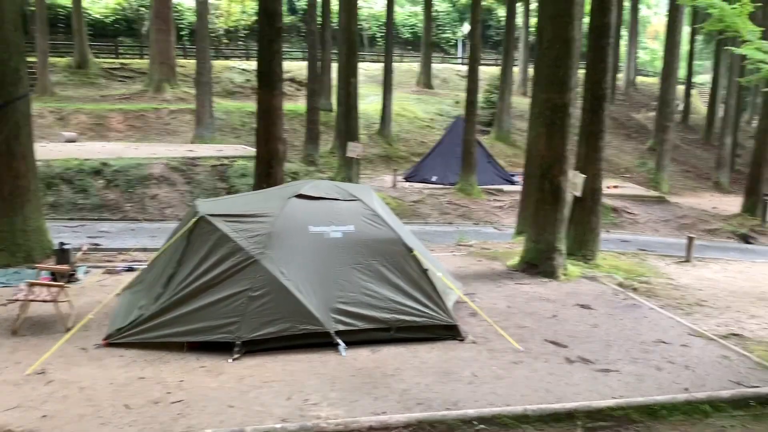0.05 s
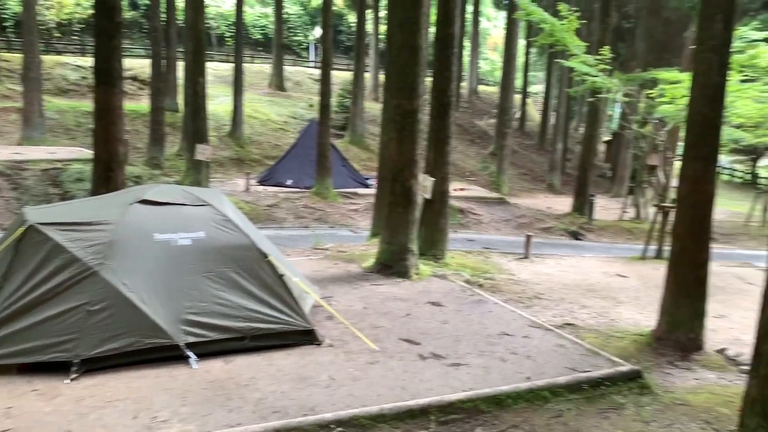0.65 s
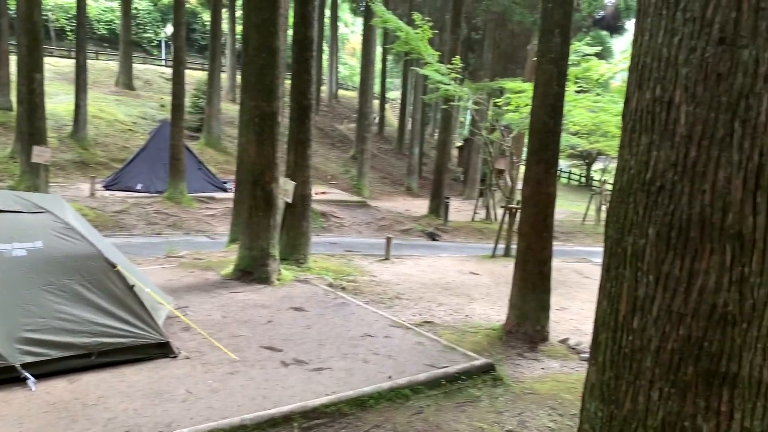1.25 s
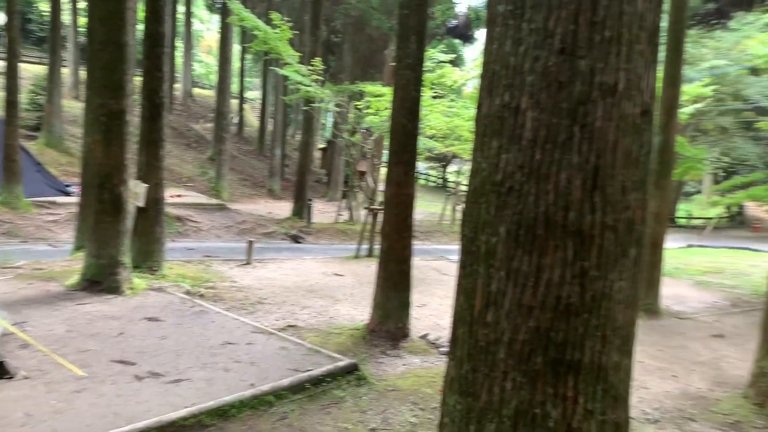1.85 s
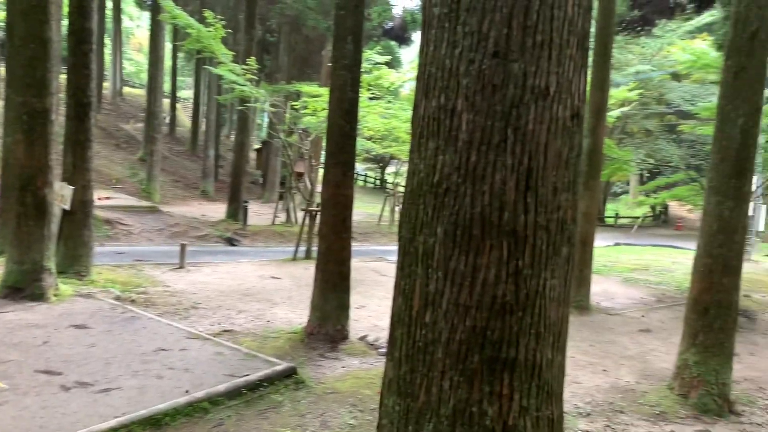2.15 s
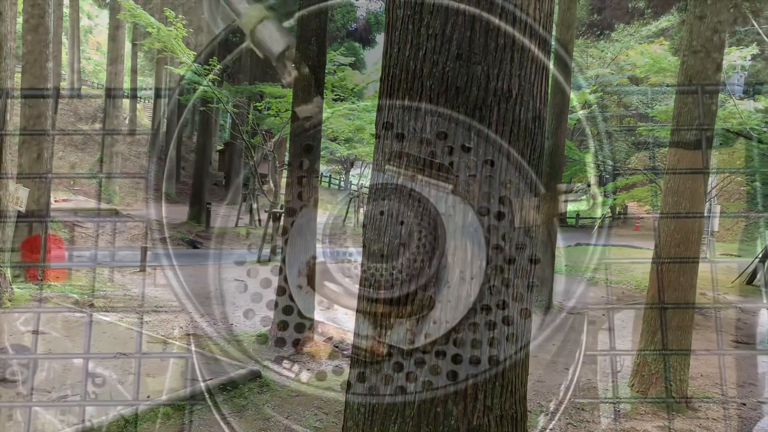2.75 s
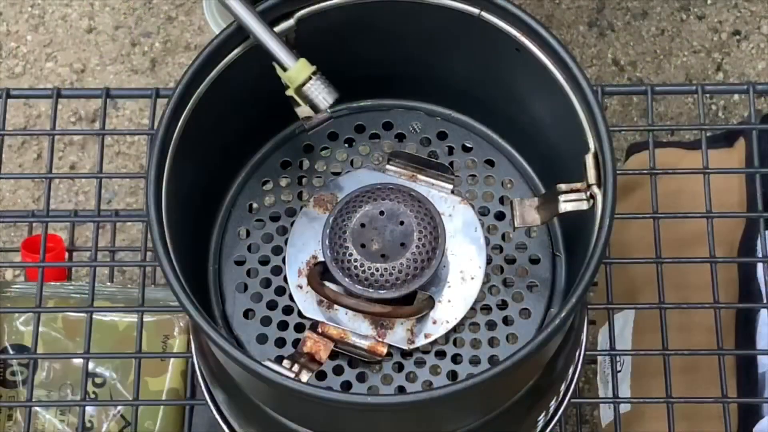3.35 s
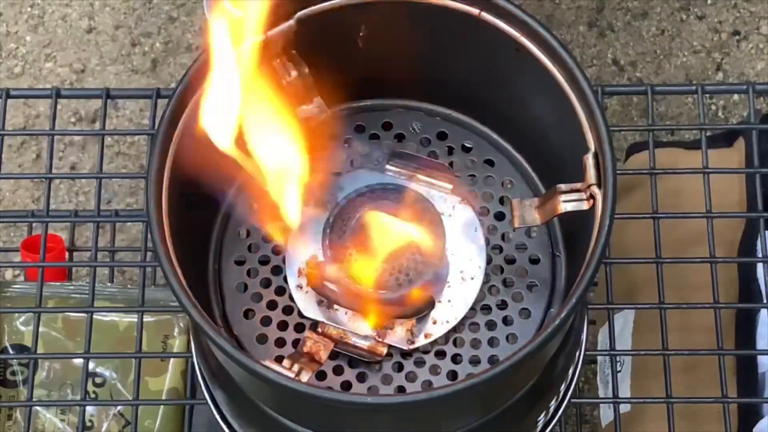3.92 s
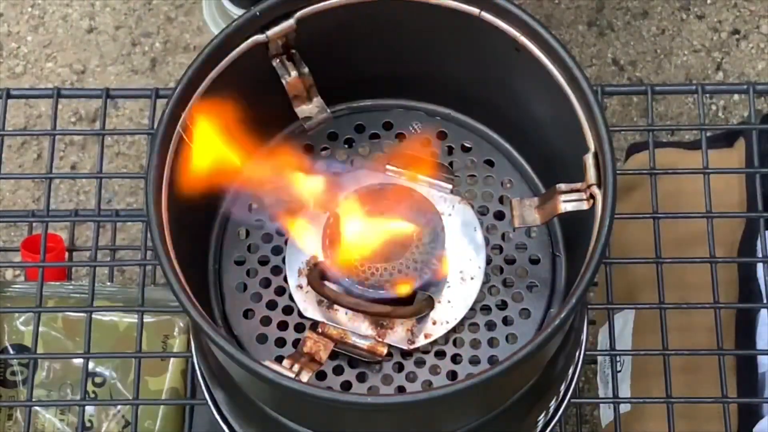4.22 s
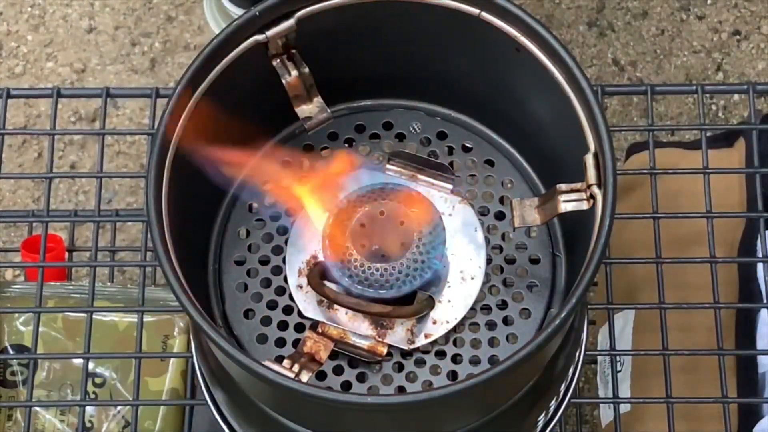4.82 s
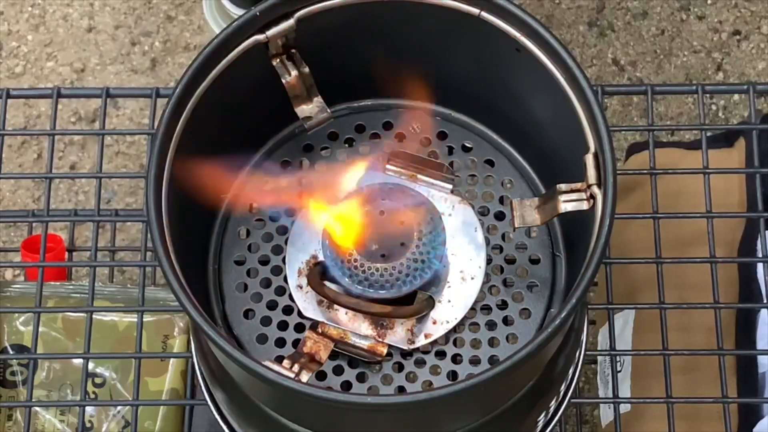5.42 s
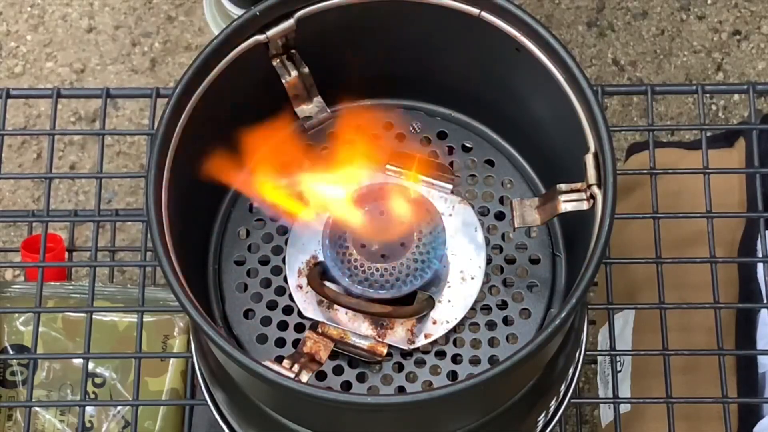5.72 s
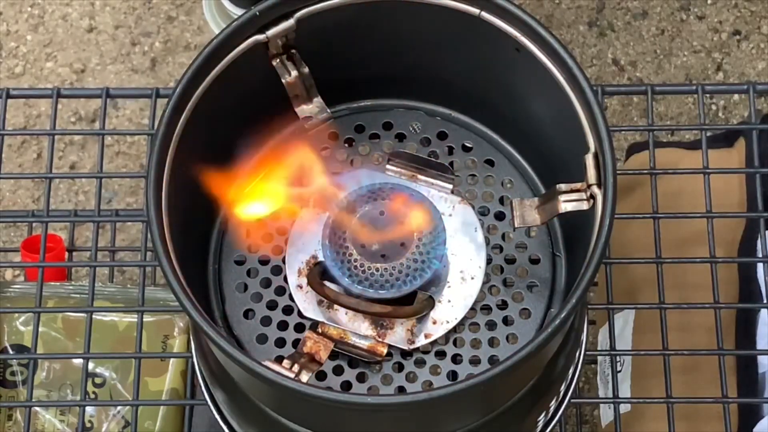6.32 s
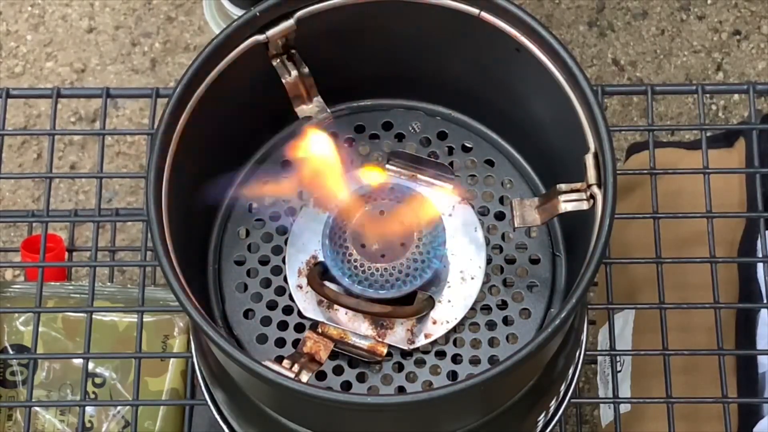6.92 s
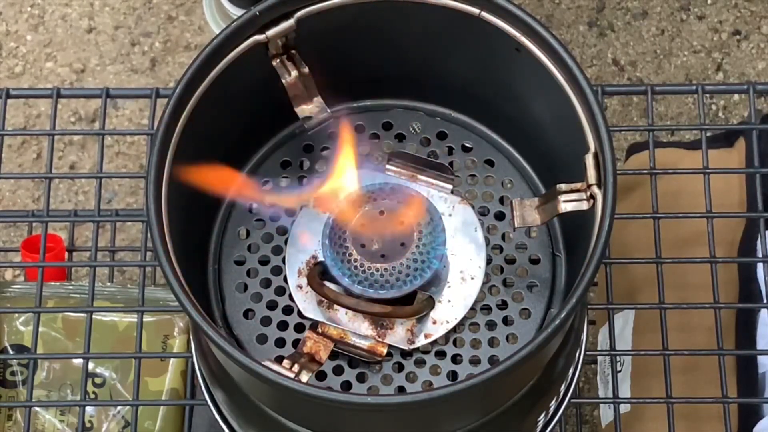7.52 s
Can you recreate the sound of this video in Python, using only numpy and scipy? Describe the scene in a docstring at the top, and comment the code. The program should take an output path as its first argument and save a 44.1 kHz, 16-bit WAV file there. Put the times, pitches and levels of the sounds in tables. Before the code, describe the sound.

A small bird gives a string of echoing chirps over the faint, low rush of a forest, with two soft, distant hoots and a very faint cricket. The steady hiss of a camp stove fades in close by, slightly to the left. A lighter snaps, the fuel catches with a whoomph, and the flame settles into a fluttering, hissing roar. A brief crackle ends in a sharp pop, then three quick spits of fuel knock against the steel windshield.

```python
"""A small bird chirps over the low rush of a forest, with a faint cricket and two soft, distant hoots.
The forest gives way to a camp stove, its fuel hissing from the nozzle inside a steel windshield.
A lighter snaps, the fuel catches with a whoomph, and the flame settles into a fluttering roar.
Droplets crackle through the nozzle and pockets of vapour pop. Then the jet spits liquid fuel
three times, each spit flaring in the flame and setting the steel ringing."""
import sys
import numpy as np
from scipy import signal
from scipy.fft import rfft, irfft, next_fast_len
from scipy.io import wavfile
from scipy.ndimage import uniform_filter1d, map_coordinates

SR = 44100
rng = np.random.default_rng(int(sys.argv[2]) if len(sys.argv) > 2 else 0)


def wav_out(sig):
    """Save sig, one row per channel (or a flat mono array), as 16-bit PCM at SR to the path in sys.argv[1]."""
    wavfile.write(sys.argv[1], SR, np.round(np.clip(np.atleast_2d(sig).T, -1, 1) * 32767).astype(np.int16))


N = 338247
FADE_S, FADE_LENGTH_S = 2.4, 1  # the forest gives way to the stove
LIT_S = 3.63  # the fuel catches


def amp(db):
    """Turn decibels into a number to multiply by."""
    return 10 ** (np.asarray(db) / 20)


def unit(x):
    """Scale x to an average strength (rms) of 1."""
    return x / np.sqrt(np.mean(x ** 2) + 1e-20)


def along(points, hz):
    """Read between the rows of a (frequency, value) table, on a log scale."""
    freqs, values = np.transpose(points)
    return np.interp(np.log(hz + 1), np.log(freqs + 1), values)


def clock():
    """The time of each sample in seconds."""
    return np.arange(N) / SR


def ramp(start, length):
    """A straight rise from 0 to 1."""
    return np.clip((clock() - start) / length, 0, 1)


def burst(start, t60, attack, hold=0):
    """A level that rises, holds and dies away; t60 is always the seconds taken to fade by 60 dB."""
    t = np.maximum(clock() - start, 0)
    decay = amp(-60 * np.clip((t - hold) / t60, 0, 2))
    return (1 - np.exp(-t / attack)) * decay * (t < hold + 2 * t60)


def placed(x, start):
    """Delay a sound by start seconds."""
    return np.pad(x, (int(start * SR), N))[:N]


def wobble(rate, size=N):
    """A smooth curve through rate random values a second."""
    values = rng.standard_normal(int(size * rate / SR) + 4)
    return map_coordinates(values, [np.arange(size) * rate / SR])


def filtered(x, response):
    """Multiply each frequency in x by response(hz)."""
    size = next_fast_len(N + 8192)
    return irfft(rfft(x, size) * response(np.fft.rfftfreq(size, 1 / SR)), size)[..., :N]


def noise(spectrum, boost_db=lambda hz: 0):
    """Noise shaped by a table of frequencies and levels, plus an optional boost."""
    return unit(filtered(rng.standard_normal(N), lambda hz: amp(along(spectrum, hz) + boost_db(hz))))


def echoes(x, decay, length):
    """A wash of echoes for each ear; each frequency dies at its own speed."""
    hz, t, bands = signal.stft(rng.standard_normal((2, int(length * SR))), SR, nperseg=128)
    tail = signal.istft(bands * amp(-60 * t / along(decay, hz)[:, None]), SR)[1]
    return signal.fftconvolve(x[None], tail / np.linalg.norm(tail[0]), axes=1)[:, :N]


# The forest air. Each row: frequency in Hz, level in dB.
AIR_TONE = [(25, -9), (70, 5.5), (130, -7.5), (220, -13), (370, -6), (700, -25.5), (1500, -26.5),
            (5000, -30), (15000, -37)]
# How alike the air is in both ears. Each row: frequency in Hz, likeness from 0 to 1.
AIR_LIKENESS = [(180, 0.94), (550, 0.44), (1650, 0.012)]
# One swell: start, rise, hold and fade in seconds, then the added rush in dB against the calm.
AIR_SWELL = (1.39, 0.023, 0.6, 1.3, 2)


def forest_air(calm_db=-69.0, by_stove_db=-8, waver_db=2.5, hiss_db=-84):
    """The low rush of the valley swells once and recedes, over a faint, even hiss."""
    spread = lambda hz: np.arccos(np.clip(along(AIR_LIKENESS, hz), -1, 1)) / 2
    mid = filtered(noise(AIR_TONE), lambda hz: np.cos(spread(hz)))
    side = filtered(noise(AIR_TONE), lambda hz: np.sin(spread(hz)))
    ears = np.array([mid + side, mid - side])
    rush = filtered(ears, lambda hz: 1 / (1 + (hz / 1500) ** 4))
    start, attack, hold, t60, db = AIR_SWELL
    swell = 1 + amp(db) * burst(start, t60, attack, hold)
    level_db = calm_db + by_stove_db * ramp(FADE_S, FADE_LENGTH_S) + waver_db * wobble(23)
    return rush * swell * amp(level_db) + amp(hiss_db) * unit(ears - rush)


# The cricket's thin rasp. Each row: frequency in Hz, level in dB.
CRICKET_TONE = [(10500, -65), (12800, 9), (13800, 7), (16000, -31)]


def cricket(db=-87, depth_db=4, pulse_hz=11.6):
    """A faint bush cricket rasps high up in even pulses."""
    pulse = np.cos(2 * np.pi * pulse_hz * (clock() - .04))
    rasp = np.array([noise(CRICKET_TONE), noise(CRICKET_TONE)])
    return amp(db + depth_db * pulse) * rasp * (clock() < FADE_S)


# Distant calls. Each row: start in seconds, length in seconds, top pitch in Hz, level in dB.
HOOTS = [(0.048, 0.51, 1373, -78.5), (1.432, 0.221, 1210, -68.5)]


def far_bird(arch_hz=119.3, waver_hz=70):
    """Soft, unsteady hoots whose pitch and strength rise and fall together."""
    calls = np.zeros(N)
    for start, length, top_hz, db in HOOTS:
        arch = np.sin(np.linspace(0, np.pi, int(length * SR)))
        hz = top_hz - arch_hz * (1 - arch) + waver_hz * wobble(160, size=len(arch))
        calls += placed(amp(db) * arch * np.sin(2 * np.pi * np.cumsum(hz) / SR), start)
    return calls


# The higher tones in the near bird's voice. Each row: multiple of the pitch, level in dB.
VOICE_OVERTONES = [(1.5, -35), (2, -17.5), (3, -27), (4, -26)]
# How throat and beak lift those tones. Each row: frequency in Hz, boost in dB.
BEAK_BOOST = [(2500, 10), (3600, 29), (4900, 13), (5800, 3.5), (7100, 0.5), (8300, 1), (14000, -0.5)]


def chirp(overtones_db, rasp_db, contour, rasp, hoarse_below_hz=3300, hoarse_range_hz=900, lag_s=35e-6):
    """One chirp climbs and drops; at low pitch the voice turns shaky, dull and hoarse."""
    times, pitches, levels = np.transpose(contour)
    t = np.arange(times[0], times[-1], 1 / SR)
    shake = lambda rate: wobble(rate, size=len(t))
    pitch, level_db = np.interp(t, times, pitches), np.interp(t, times, levels)
    hoarse = np.clip((min(hoarse_below_hz, pitches.max()) - pitch) / hoarse_range_hz, 0, 1)
    pitch *= 1 + (.005 + .04 * hoarse) * shake(466)
    ear_shift = pitch * lag_s * np.array([[.5], [-.5]])  # the left ear hears it first
    phase = 2 * np.pi * (np.cumsum(pitch) / SR + ear_shift) + .1 * shake(1100)
    tone = amp(-1 * hoarse) * np.sin(phase)
    overtones = sum(amp(db + along(BEAK_BOOST, k * pitch) + 4.5 * shake(269)) * np.sin(k * phase)
                    for k, db in VOICE_OVERTONES)
    # Overtones fade less than the main tone in the quiet parts.
    brightness = amp(overtones_db + .3 * (level_db.max() - level_db) - 9 * hoarse)
    rasp = filtered(rasp, lambda hz: amp(overtones_db * (hz > 5000)))  # its treble follows the overtones
    grit = amp(rasp_db) * hoarse * rasp[int(times[0] * SR):][:len(t)]
    opening = np.clip((t - t[0]) / .016, 0, 1) ** 2  # the chirp starts as a pure tone
    edges = np.clip(np.minimum(t - t[0], t[-1] - t) / .005, 0, 1)
    loudness = edges * amp(level_db + 1.7 * shake(295.6))
    voice = loudness * (tone + opening * (brightness * overtones + opening * grit))
    return np.array([placed(ear, times[0]) for ear in voice])


# The near bird's song. Each row: overtones, hoarseness and echo in dB, then the chirp's shape
# as a list of points, each with time in seconds, pitch in Hz, level in dB.
SONG = [ (-16, -16, 6, [(.203, 2650, -73), (.212, 3020, -62), (.245, 3300, -53), (.3, 3350, -53),
        (.318, 2650, -65), (.335, 2600, -73)]), (-18, -8, 6, [(.91, 2700, -75), (.93, 3100, -63),
        (.968, 3170, -58), (.99, 2850, -64), (1.015, 2200, -66), (1.048, 1700, -72)]),
        (3.5, -4.5, 3, [(1.399, 2650, -65), (1.413, 3200, -50), (1.44, 3420, -51), (1.474, 3500, -42),
        (1.492, 3100, -51), (1.52, 1820, -60), (1.548, 1700, -65)]), (0.5, -4.5, 0, [(1.69, 1600, -64),
        (1.7, 3200, -48), (1.738, 3650, -44), (1.757, 4080, -33.5), (1.771, 3920, -34), (1.78, 3150, -46),
        (1.797, 1950, -55), (1.827, 1700, -57)]), (0, -1.5, -1.5, [(2.019, 1700, -62), (2.026, 3250, -44),
        (2.065, 4480, -36.5), (2.108, 4980, -36.5), (2.122, 4400, -39), (2.126, 3000, -48),
        (2.135, 1650, -61), (2.172, 1650, -63)]), (-5, -2, -1, [(2.168, 1900, -61), (2.177, 3750, -50),
        (2.195, 4550, -39), (2.211, 4150, -42), (2.22, 2450, -55), (2.237, 2300, -66)]),
        (-10, -2, 0, [(2.919, 3350, -56), (2.958, 3720, -48), (2.98, 4200, -45), (2.994, 3850, -51),
        (3.018, 2100, -66)]), ]
# The hoarse part of its voice. Each row: frequency in Hz, level in dB.
RASP_TONE = [(1100, -22), (1900, -1), (3900, 7), (5800, -3), (9000, -3), (14000, -26)]
# Echoes from the ground, near trunks and deep forest. Each row: frequency in Hz, fade in seconds.
GROUND_ECHO = [(4000, .03)]
TRUNK_ECHO = [(1500, 0.3), (4000, 0.62), (12000, 0.25)]
FOREST_ECHO = [(500, 0.7), (4000, 1.06), (8000, 1.3), (14000, 0.13)]


def birds(hill_delay_s=0.1, dull_hz=15000, echo_above_hz=1900):
    """The near song bounces off ground, trunks and hillside; the far bird arrives only as echo."""
    rasp = noise(RASP_TONE)
    song, outward = np.zeros((2, N)), np.zeros(N)
    for overtones_db, rasp_db, echo_db, contour in SONG:
        voice = chirp(overtones_db, rasp_db, contour, rasp)
        song += voice
        outward += amp(echo_db) * voice[0]
    direct = filtered(song, lambda hz: 1 / (1 + (hz / dull_hz) ** 20))
    near = filtered(outward, lambda hz: hz ** 4 / (hz ** 4 + echo_above_hz ** 4))
    far = far_bird()
    ground = amp(-5) * echoes(direct[0], GROUND_ECHO, length=.5)
    trunks = amp(-5.5) * echoes(near, TRUNK_ECHO, length=0.65)
    hillside = amp(-12) * echoes(placed(near, hill_delay_s), TRUNK_ECHO, length=0.41)
    forest = echoes(amp(-10) * near + far, FOREST_ECHO, length=0.68)
    return amp(-0.7) * direct + ground + trunks + hillside + forest


# Where the steel windshield rings. Each row: frequency in Hz, width in Hz, boost in dB.
STEEL_PEAKS = [(2620, 110, 4), (3470, 130, 5.5), (4400, 195, 5.5), (4843, 266, 11), (7600, 90, 2.5),
               (10600, 300, 8.5)]


def steel_hiss(spectrum, ring):
    """A hiss coloured by the windshield; ring scales the steel's boosts."""
    peaks = lambda hz: sum(db * np.exp(-((hz - mid) / width) ** 2) for mid, width, db in STEEL_PEAKS)
    return noise(spectrum, lambda hz: ring * peaks(hz))


# The hiss of unlit fuel. Each row: frequency in Hz, level in dB.
GAS_TONE = [(150, -14.5), (330, -27), (600, -8.5), (1500, -7.5), (2100, -12.5), (3100, -12.5), (3750, -7),
            (4150, 2), (4650, 2), (5300, -9), (6600, 3), (8500, -4.5), (9700, -4), (13000, -25.5),
            (15500, -9)]


def unlit_jet(db=-46, catch_s=0.033, t60=0.34):
    """Fuel streams evenly from the nozzle until the flame reaches it."""
    dying_db = -60 * np.maximum(clock() - LIT_S - catch_s, 0) / t60
    loudness = ramp(FADE_S, FADE_LENGTH_S) * amp(db + dying_db + 0.12 * wobble(14))
    return loudness * steel_hiss(GAS_TONE, ring=0.25)


def cracks(rows, spectrum, t60):
    """Sharp clicks of noise, one for each row's start and level."""
    return noise(spectrum) * sum(amp(db) * burst(start, t60, attack=.0001) for start, db, *_ in rows)


def knock(rows, hz, ring_db, t60):
    """Each crack sets off a short, slightly wavering ring."""
    waver = .5 * wobble(160)
    tone = lambda start: np.sin(2 * np.pi * hz * (clock() - start) + waver)
    return sum(amp(db + ring_db) * burst(start, t60, attack=0.0005) * tone(start) for start, db in rows)


# The lighter's snap. Each row: start in seconds, level in dB.
LIGHTER_SNAPS = [(3.6283, -7.5)]
# Its click. Each row: frequency in Hz, level in dB.
SNAP_TONE = [(900, -12.5), (1650, -15), (2200, -27), (3000, -3.5), (4000, -8), (5300, -3.5), (6800, 5),
             (10000, -7), (12500, -9), (15000, -9)]
# Its metal tip. Each row: pitch in Hz, level in dB, fade in seconds.
TIP_RINGS = [(1350, -8, .012), (1720, -5, .016), (7000, -2, .008)]


def lighter():
    """The lighter snaps and its metal tip rings."""
    click = cracks(LIGHTER_SNAPS, SNAP_TONE, t60=0.017)
    return click + sum(knock(LIGHTER_SNAPS, hz, db, t60) for hz, db, t60 in TIP_RINGS)


# The flame's roar and the burning jet's hiss. Each row: frequency in Hz, level in dB.
ROAR_TONE = [(20, -33), (65, 7), (130, 0), (300, -4), (550, -12.5), (1100, -12), (2100, -20), (4500, -71)]
JET_TONE = [(900, 3.5), (2000, -5.5), (4000, 1.5), (5300, 2), (7500, 1), (10000, 1), (12000, -24),
            (14500, -3.5), (15700, -3.5)]
# The nozzle's breathy whistle. Each row: time in seconds, pitch in Hz, level in dB.
WHISTLE_PATH = [(3.7, 7300, -85), (3.88, 7300, -56), (3.95, 7400, -74), (4.06, 7100, -66),
                (4.27, 6250, -69), (4.6, 6700, -77), (4.71, 8100, -63), (4.92, 7750, -58), (5.1, 7500, -64),
                (6.1, 7800, -60.5), (7.67, 7510, -61.5)]


def flame(roar_db=-53.5, jet_db=-53, warm_up_s=0.52, whistle_width_hz=750, wander_hz=130):
    """The roar grows as the burner warms; the jet's hiss and whistle waver with the fuel pressure."""
    cold = np.exp(-np.maximum(clock() - LIT_S, 0) / warm_up_s)
    pressure = wobble(12)
    flutter_db = 1.7 * wobble(18)
    rumble = unit(noise(ROAR_TONE) * amp(2 * wobble(150)))
    roar = amp(roar_db - 11 * cold + flutter_db) * rumble
    jet = amp(jet_db - 7.5 * cold) * patchy(steel_hiss(JET_TONE, ring=0.95))
    times, pitches, levels = np.transpose(WHISTLE_PATH)
    pitch = np.interp(clock(), times, pitches) + wander_hz * pressure
    band = wobble(whistle_width_hz) + 1j * wobble(whistle_width_hz)
    breath = np.real(band * np.exp(2j * np.pi * np.cumsum(pitch) / SR))  # noise moved up to the pitch
    whistle = amp(np.interp(clock(), times, levels)) * unit(breath)
    return (roar + amp(pressure) * (jet + whistle)) * ramp(LIT_S, 0.068)


def patchy(hiss, depth_db=1.5):
    """Make a hiss uneven, in random patches about 600 Hz wide and 70 ms long."""
    bands = signal.stft(hiss, nperseg=512)[2]
    patches = uniform_filter1d(rng.standard_normal(bands.shape), size=7, axis=0)
    patches = uniform_filter1d(patches, size=12, axis=1)
    return signal.istft(bands * amp(depth_db * unit(patches)))[1][:N]


# Tongues of flame leaping up. Each row: start in seconds, length in seconds, level in dB.
TONGUES = [(3.671, 0.026, -35), (3.721, 0.041, -36), (3.784, 0.017, -42.5), (4.37, 0.08, -53.5),
           (4.887, 0.36, -56.5), (6.762, 0.56, -54.5)]
# The low whoomph and the tongues' roar. Each row: frequency in Hz, level in dB.
THUMP_TONE = [(20, -2), (65, 5.5), (130, 4.5), (300, -16), (700, -32)]
TONGUE_TONE = [(80, 4), (250, 13), (600, 6), (1200, 1), (2200, -12), (6000, -50)]


def ignition(thump_db=-31.5, sizzle_db=-36):
    """Pooled fuel goes up with a whoomph and a sizzle; tongues of flame leap up then and later."""
    thump = amp(thump_db) * burst(LIT_S, t60=0.28, attack=0.046, hold=0.13) * noise(THUMP_TONE)
    tongues = sum(amp(db) * burst(start, t60=0.072, attack=0.18 * length, hold=length)
                  for start, length, db in TONGUES)
    roar = tongues * unit(noise(TONGUE_TONE) * amp(3 * wobble(160)))
    sizzle = amp(sizzle_db) * burst(LIT_S + 0.095, t60=0.4, attack=0.0036, hold=0.0093)
    return thump + roar + sizzle * steel_hiss(JET_TONE, ring=0.091)


# One faint pop and one loud one. Each row: start in seconds, level in dB.
VAPOUR_POPS = [(4.19, -43), (5.3174, -19)]
# The sound of a pop. Each row: frequency in Hz, level in dB.
POP_TONE = [(400, -8.5), (1200, -14), (2200, 3), (3500, -16), (5000, -3.5), (12000, -12), (15000, -17)]


def pops():
    """A pocket of vapour bursts with a click and a very short ring."""
    return cracks(VAPOUR_POPS, POP_TONE, t60=0.016) + knock(VAPOUR_POPS, hz=2260, ring_db=-1, t60=0.008)


# A quick run of fuel droplets. Each row: start in seconds, level in dB.
DROPLET_TICKS = [(5.2078, -26), (5.2232, -25), (5.2354, -20), (5.2442, -25), (5.2512, -25), (5.266, -18),
                 (5.2723, -18.5), (5.2788, -17.5), (5.2845, -18), (5.291, -21), (5.298, -25), (5.3072, -22)]
# The sound of a tick. Each row: frequency in Hz, level in dB.
TICK_TONE = [(600, -9), (2500, -1.5), (4300, -9), (5700, -4), (6900, 5), (11500, -4), (15000, 2)]


def droplets(fizz_db=-25):
    """Each droplet ticks through the nozzle and leaves a short fizz."""
    ticks = cracks(DROPLET_TICKS, TICK_TONE, t60=.006)
    return ticks + amp(fizz_db) * cracks(DROPLET_TICKS, TICK_TONE, t60=.04)


# Spits of fuel; the first three run together. Each row: start in seconds, crack in dB,
# spray in dB, spray length in seconds, flare in dB, ring in dB.
FUEL_SPITS = [(6.1412, -25.5, -42, .0021, -34, -31.5), (6.1574, -42, -46, 0.0053, -41, -35.5),
              (6.1698, -28, -45, .0066, -30, -35), (6.3096, -40, -38, 0.0029, -29.5, -39.5),
              (6.4184, -22.5, -25, 0.056, -21, -33.5)]
# A spit's spray and the puff of its flare. Each row: frequency in Hz, level in dB.
SPRAY_TONE = [(500, 0), (1200, -2.5), (3200, 4), (4100, -5.5), (5500, 7.5), (6700, 2.5), (7600, 10.5),
              (8700, -6), (9700, 6.5), (12000, -15.5), (14800, -2)]
PUFF_TONE = [(60, -25), (170, 3.5), (390, -0.5), (540, -18), (800, -3), (1400, -7), (2500, -10),
             (6000, -22)]
# The windshield's clunk. Each row: pitch in Hz, level in dB, fade in seconds.
CLUNK_RINGS = [(370, -1, .06), (826, -2, 0.11), (976, -1, 0.09), (1208, -1, 0.09), (1455, -2.5, .09),
               (2480, 1.5, 0.03)]


def spits(sag_db_per_s=110, puff_db=-3):
    """Liquid fuel cracks out, rings the steel and sprays as pressure drops; its flare booms inside."""
    spray, puff, flares, blows = np.zeros(N), np.zeros(N), [], []
    for start, _, spray_db, length, flare_db, ring_db in FUEL_SPITS:
        sag_db = sag_db_per_s * np.maximum(clock() - start, 0)
        spray += amp(spray_db - sag_db) * burst(start, t60=0.066, attack=0.0012, hold=length)
        puff += amp(flare_db + puff_db) * burst(start, t60=0.12, attack=0.0033, hold=0.0009)
        flares.append((start, flare_db))
        blows.append((start, ring_db))
    splutter = unit(steel_hiss(SPRAY_TONE, ring=0.094) * amp(wobble(480)))
    clunk = sum(knock(blows, hz, db, t60) for hz, db, t60 in CLUNK_RINGS)
    boom = knock(flares, hz=280, ring_db=-4, t60=0.15)
    crack = cracks(FUEL_SPITS, SPRAY_TONE, t60=0.023)
    return crack + spray * splutter + puff * noise(PUFF_TONE) + clunk + boom


# How much later the right ear hears the stove. Each row: frequency in Hz, delay in seconds.
EAR_DELAY = [(100, 0.00014), (1800, 0.000049), (4000, 0.000046), (5200, 0.0001), (8000, 0.00012)]
# Echoes between the windshield's walls. Each row: frequency in Hz, fade in seconds.
WALL_ECHO = [(200, 0.38), (2000, 0.088), (12000, 0.046)]


def scene():
    """The forest, and a stove close by on the left that echoes inside its windshield."""
    clicks = lighter() + pops()
    stove = unlit_jet() + flame() + ignition() + spits() + clicks + droplets()
    left_right = np.array([[1], [-1]])
    direct = filtered(stove, lambda hz: np.exp(1j * np.pi * hz * along(EAR_DELAY, hz) * left_right))
    less_bass = filtered(stove, lambda hz: hz / (hz + 250))
    walls = amp(-11.5) * echoes(less_bass, WALL_ECHO, length=.1)
    return direct + walls + birds() + cricket() + forest_air()


def record(dry):
    """Cut away the very highest treble."""
    top_hz = 15950
    return filtered(dry, lambda hz: 1 / (1 + (hz / top_hz) ** 200))


dry = scene()
out = record(dry)
wav_out(out)
```